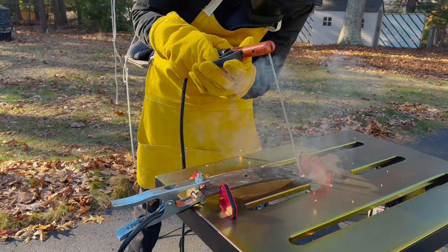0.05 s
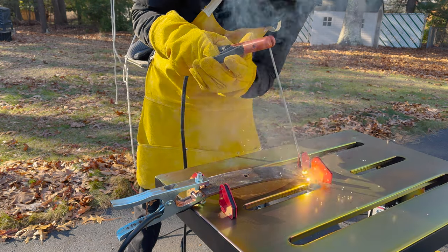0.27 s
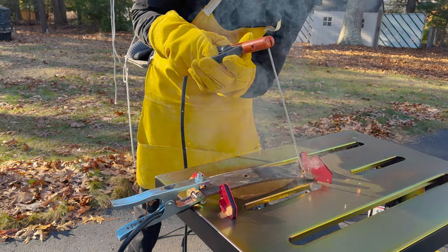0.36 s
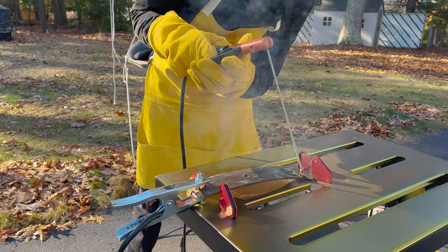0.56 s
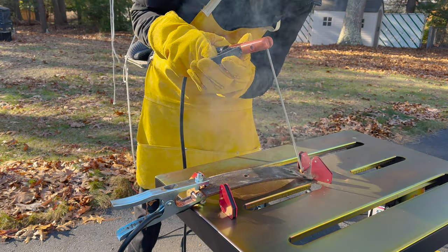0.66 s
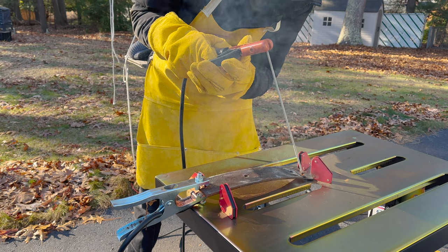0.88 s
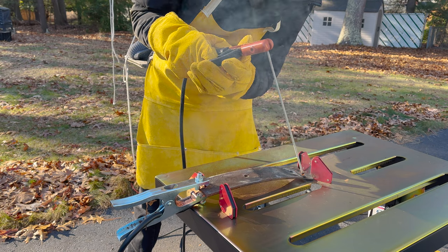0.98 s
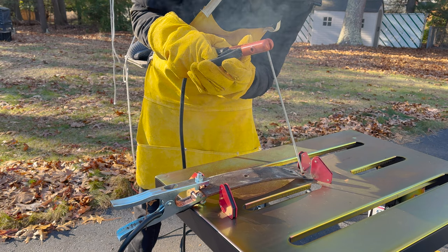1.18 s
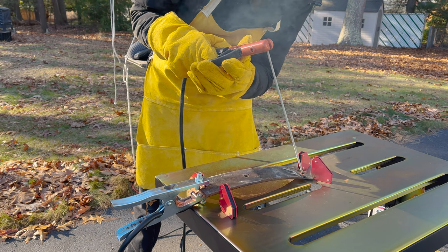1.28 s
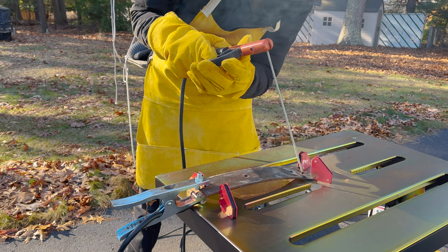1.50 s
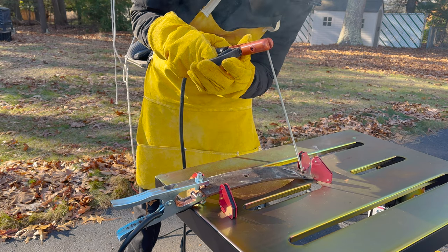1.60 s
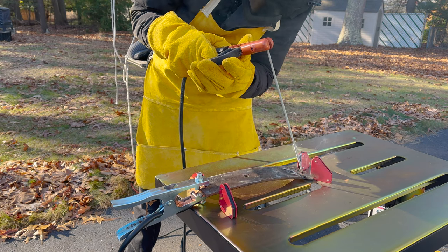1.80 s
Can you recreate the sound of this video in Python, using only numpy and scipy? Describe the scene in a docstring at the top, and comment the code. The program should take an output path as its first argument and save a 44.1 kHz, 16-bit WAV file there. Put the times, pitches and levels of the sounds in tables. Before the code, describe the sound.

Close microphone in an open yard: light slag fizz, a brief gritty arc sizzle, a hard double pop, scattered ticks dying away, then four thin rising bird whistles above a swelling low hum, fan tones and air.

```python
"""A welding arc close by outdoors, on a steel plate: it spits and sizzles, flares and blows out in two pops.
The arc is grainy filtered noise with short clicks; each pop is a crack, a boom whose pitch falls quickly
and a short dull body of fixed tones. Hot slag fizzes and ticks as filtered noise and clicks, and a small
bird gives four thin rising whistles. Under it all lie rushing air, the wavering tones of the welder's fan
and a low motor hum that swells."""
import sys
import numpy as np
from scipy import signal
from scipy.fft import rfft, irfft, next_fast_len
from scipy.io import wavfile
from scipy.ndimage import map_coordinates

SR = 44100
rng = np.random.default_rng(int(sys.argv[2]) if len(sys.argv) > 2 else 0)


def persist_wave(psi):
    """Save psi, clipped to +-1, as 16-bit WAV."""
    counts = np.round(np.clip(psi, -1, 1) * 32767).astype(np.int16)
    wavfile.write(sys.argv[1], SR, np.atleast_2d(counts).T)


N = 81585  # samples

# Left-right likeness of the weld's noise. Each row: frequency in Hz, coherence from -1 to 1.
WELD_ALIKE = [(300, .98), (800, 0.93), (1550, .35), (2200, .92), (3300, 0.57), (5000, 1), (7300, .2),
              (8600, 0.47), (10200, -0.78), (14500, 0.34)]


def amp(db):
    """Decibels to gain."""
    return 10 ** (np.asarray(db) / 20)


def unit(x):
    """Scale to rms 1."""
    return x / np.sqrt(np.mean(x ** 2) + 1e-20)


def clock():
    """Time of every sample in seconds."""
    return np.arange(N) / SR


def along(points, hz):
    """Read (Hz, value) points on a log frequency axis."""
    f, v = np.transpose(points)
    return np.interp(np.log(hz + 1), np.log(f + 1), v)


def curves(rows):
    """One value per sample for each column after the time."""
    s, *cols = np.transpose(rows)
    return [np.interp(clock(), s, c) for c in cols]


def wobble(rate):
    """A smooth random curve through rate knots a second."""
    knots = rng.standard_normal(int(N * rate / SR) + 4)
    return map_coordinates(knots, [clock() * rate])


def filtered(x, response):
    """Multiply the spectrum of x by a response of frequency, zero-padded against wrap-around."""
    m = 2 * next_fast_len(N)
    hz = np.fft.rfftfreq(m, 1 / SR)
    return irfft(rfft(x, m) * response(hz), m)[..., :N]


def causal(points):
    """The minimum-phase response with these (Hz, dB) gains, so that no sound precedes its onset."""
    def response(hz):
        # Folding the cepstrum onto positive times gives minimum phase.
        cepstrum = irfft(np.log(amp(along(points, hz))))
        half = len(cepstrum) // 2
        cepstrum[1:half] *= 2
        cepstrum[half + 1:] = 0
        return np.exp(rfft(cepstrum))
    return response


def spread(pair, alike):
    """Mix two unrelated signals into left and right of a given coherence."""
    def mid_side_gains(hz):
        turn = np.arccos(np.clip(along(alike, hz), -1, 1)) / 2
        return np.array([np.cos(turn), np.sin(turn)])
    mid, side = filtered(pair, mid_side_gains)
    return np.array([mid + side, mid - side])


def noise(spectrum, alike, grain_db):
    """Stereo noise of rms 1; a scatter of sizes makes it grainy."""
    sizes = amp(grain_db * rng.standard_normal(N))
    grains = rng.standard_normal((2, N)) * sizes
    return unit(spread(filtered(grains, causal(spectrum)), alike))


def envelope(start, attack, hold, t60):
    """Linear rise, then an exponential release that begins hold seconds after the start."""
    t = clock() - start
    return np.clip(t / attack, 0, 1) * amp(-60 * np.maximum(t - hold, 0) / t60)


def snaps(rows, spectrum, spray_db, spray_t60):
    """Each (s, dB) is a sharp filtered click, alike in both ears, trailed by a short spray of noise."""
    hits, spray = np.zeros(N), np.zeros(N)
    for s, db in rows:
        hits[round(s * SR)] += amp(db)
        spray += amp(db + spray_db) * envelope(s, 1 / SR, 0, spray_t60)
    # Scaled so that a lone click peaks at its listed level.
    peak = abs(filtered(signal.unit_impulse(N), causal(spectrum))).max()
    hiss = spread(rng.standard_normal((2, N)), WELD_ALIKE)
    return filtered(hits + spray * hiss, causal(spectrum)) / peak


def echo(x, decay):
    """A diffuse tail in which each frequency dies at its own speed."""
    hz, t, z = signal.stft(rng.standard_normal((2, SR // 2)), SR, nperseg=256)
    fading = amp(-60 * t / along(decay, hz)[:, None])
    tail = signal.istft(z * fading, SR, nperseg=256)[1]
    return signal.fftconvolve(x, tail / np.linalg.norm(tail[0]), axes=1)[:, :N]


def tone(hz, drift_hz):
    """A sine of rms 1 whose pitch drifts at random."""
    cycles = np.cumsum(hz + drift_hz * wobble(12)) / SR
    return np.sqrt(2) * np.sin(2 * np.pi * cycles)


def background():
    """Rushing air as filtered noise, the fan's wavering tones, and a wavering motor hum with its octave."""
    # Spectrum of the air. Each row: frequency in Hz, relative level in dB.
    air_spectrum = [(20, -18), (32, -8), (50, 0.5), (100, -1), (170, -8.5), (240, -9.5), (305, -13.5),
                    (345, -3.5), (395, -8), (440, -13.5), (540, -13.5), (700, -10), (950, -9), (1400, -14),
                    (1900, -21), (2600, -36.5), (4000, -49), (5000, -54), (10000, -68), (14000, -58.5)]
    # Left-right likeness of the air. Each row: frequency in Hz, coherence from -1 to 1.
    air_alike = [(60, 1), (140, .88), (210, 0.75), (330, 0.98), (500, .66), (770, -0.0089), (1170, -0.45),
                 (1550, -0.012), (2000, 0.77), (2750, 0.82), (5000, 0.96), (10000, -0.062), (15000, 0.71)]
    # Swells of the motor. Each row: time in seconds, fundamental in dB, octave in dB.
    hum_levels = [(0, -47, -69), (.3, -54.5, -57), (.45, -45, -56), (.6, -57.5, -61), (.8, -52.5, -73),
                  (1, -41, -50.5), (1.15, -52.5, -50.5), (1.3, -41, -46.5), (1.52, -52, -48.5),
                  (1.7, -43.5, -49.5), (1.85, -52.5, -59)]
    # Tones of the welder's fan. Each row: mean frequency in Hz, middle level in dB.
    fan_tones = [(297.5, -54.5), (522, -56.5)]
    air_db, hum_hz = -41.5, 70.3

    air = amp(air_db + 0.13 * wobble(6.3)) * noise(air_spectrum, air_alike, grain_db=0)
    low_db, octave_db = curves(hum_levels)
    low = amp(low_db + 2 * wobble(16)) * tone(hum_hz, drift_hz=2.27)
    octave = amp(octave_db + 0.58 * wobble(27)) * tone(2 * hum_hz, drift_hz=1.6)
    fan = sum(amp(db + 3.3 * wobble(7.44)) * tone(hz, drift_hz=1.0) for hz, db in fan_tones)
    return air + low + octave + fan


def slag():
    """Cooling slag and spatter: a grainy fizz of uneven level, and ticks as filtered clicks."""
    # Level of the fizz. Each row: time in seconds, level in dB.
    fizz_levels = [(0, -63.5), (.085, -66.5), (.12, -72), (.16, -72), (.27, -64.5), (.36, -67), (.4, -72.5),
                   (.48, -75), (.56, -69), (.635, -60.5), (.66, -68.5), (.73, -61.5), (.8, -70.5),
                   (.93, -71.5), (1.05, -79.5), (1.3, -89), (1.85, -92)]
    # Spectrum of the fizz. Each row: frequency in Hz, relative level in dB.
    fizz_spectrum = [(1500, -6.5), (3000, 2), (5000, -3.5), (6500, -1), (7600, -1), (9500, 0.5),
                     (15000, -5)]
    # Ticks of the slag. Each row: start in seconds, level in dB.
    tick_rows = [(.0755, -40), (.155, -42), (.337, -64), (.349, -61), (.363, -65), (.376, -57), (.455, -45),
                 (.4925, -43), (.536, -48), (.5513, -42), (.5715, -60), (.5905, -45), (.5935, -35),
                 (.611, -57), (.634, -40), (.6668, -24), (.9203, -44)]
    # Spectrum of a tick. Each row: frequency in Hz, relative level in dB.
    tick_spectrum = [(300, -1), (1000, 12), (1600, -4), (2400, 5), (4500, -5), (6800, 2.5), (8500, -5.5),
                     (15000, -8.5)]

    level_db, = curves(fizz_levels)
    fizz = amp(level_db + 0.95 * wobble(120)) * noise(fizz_spectrum, WELD_ALIKE, grain_db=7)
    return fizz + snaps(tick_rows, tick_spectrum, spray_db=-18, spray_t60=0.026)


def arc():
    """The arc spits unevenly while its grainy sizzle grows louder, then flares as the rod's tip melts."""
    # Sparks while the arc burns. Each row: start in seconds, level in dB.
    spit_rows = [(.1805, -16.5), (.1835, -21.5), (.1938, -18), (.2027, -20), (.2055, -19.5), (.2124, -18),
                 (.2145, -16), (.2255, -43)]
    # Spectrum of a spit. Each row: frequency in Hz, relative level in dB.
    spit_spectrum = [(150, -5), (450, 3.5), (1200, 0.5), (2700, 1.5), (3700, -4), (4600, -13.5), (6500, -9),
                     (9000, -17.5), (15000, -12.5)]
    # Spectrum of the sizzle. Each row: frequency in Hz, relative level in dB.
    sizzle_spectrum = [(100, 0), (400, 2.5), (1200, -2), (2500, 1), (3700, -2), (4500, -16), (6500, -5),
                       (9000, -14), (15000, -12.5)]
    # Spectrum of the flare. Each row: frequency in Hz, relative level in dB.
    flare_spectrum = [(200, -26.5), (600, -13.5), (1000, -11), (1600, 1), (2300, -1), (3700, -9),
                      (4700, -25.5), (7000, -20), (15000, -21.5)]
    on_s, off_s, release_s = .1805, 0.2433, 0.097
    start_db, rise_db = -42.5, 7

    burn_s = off_s - on_s
    heat = np.clip((clock() - on_s) / burn_s, 0, 1)
    burn = envelope(on_s, .001, burn_s, release_s)
    sizzle_level = amp(start_db + rise_db * heat + 1.68 * wobble(250)) * burn
    sizzle = sizzle_level * noise(sizzle_spectrum, WELD_ALIKE, grain_db=9.5)
    flare_level = amp(-18) * envelope(.2347, attack=0.0036, hold=0.0047, t60=0.039)
    flare = flare_level * noise(flare_spectrum, WELD_ALIKE, grain_db=3.5)
    return sizzle + flare + snaps(spit_rows, spit_spectrum, spray_db=-21, spray_t60=.012)


def pops():
    """Molten metal bursts: a crack, a boom whose pitch falls quickly, and a short dull body of fixed tones."""
    # Pops that blow the arc out. Each row: start in seconds, crack in dB, boom's start pitch in Hz,
    # boom's end pitch in Hz, boom in dB, boom's 60 dB decay time in seconds.
    pop_rows = [(.2400, -3, 500, 389, -13, 0.035), (.2473, -3.5, 925, 184, -9.5, 0.03)]
    # Spectrum of the crack. Each row: frequency in Hz, relative level in dB.
    crack_spectrum = [(60, -24.5), (250, -13.5), (550, 12.5), (900, 4.5), (1400, -4), (1750, -11.5),
                      (2400, 1.5), (3200, -8.5), (3900, -6.5), (4600, -25), (6200, -15.5), (8500, -23),
                      (15000, -23.5)]
    # Short dull body of fixed tones under each pop. Each row: frequency in Hz, level in dB relative
    # to the crack, 60 dB decay time in seconds.
    body_modes = [(393, -23, 0.0384), (502.5, -11, 0.034), (960, -26, 0.033), (1390, -19, 0.042),
                  (2488, -29, .04), (2735, -38, 0.029)]
    fall_s, low_cut_hz = .0011, 55

    sound = snaps([row[:2] for row in pop_rows], crack_spectrum, spray_db=-20, spray_t60=0.01)
    for s, crack_db, start_hz, end_hz, boom_db, boom_t60 in pop_rows:
        age = np.maximum(clock() - s, 0)
        # Cycles so far of a pitch that falls exponentially to its end.
        cycles = end_hz * age + (start_hz - end_hz) * fall_s * (1 - np.exp(-age / fall_s))
        boom = amp(boom_db) * envelope(s, 0.00018, 0, boom_t60) * np.sin(2 * np.pi * cycles)
        sound = sound + boom
        for hz, db, t60 in body_modes:
            body_level = amp(crack_db + db) * envelope(s, .0003, 0, t60)
            sound = sound + body_level * np.cos(2 * np.pi * hz * age)
    return filtered(sound, lambda hz: (1j * hz / (low_cut_hz + 1j * hz)) ** 2)


def bird():
    """Thin upward whistles that level off and linger among the trees."""
    # Bird calls. Each row: start in seconds, level in dB.
    call_rows = [(.845, -67), (0.986, -64), (1.114, -65), (1.248, -66)]
    # Reverberation of the trees. Each row: frequency in Hz, 60 dB decay time in seconds.
    tree_decay = [(5000, 0.26), (9000, 0.44)]
    start_hz, top_hz, glide_s = 5630, 8470, .025
    attack_s, length_s = 0.01, 0.052

    song = np.zeros(N)
    for s, db in call_rows:
        age = np.maximum(clock() - s, 0)
        hz = top_hz - (top_hz - start_hz) * np.exp(-age / glide_s) + 140 * wobble(810)
        # A gentle fade through the call, then a quick one at its end.
        shape = envelope(s, attack_s, attack_s, 0.46) * envelope(s, attack_s, length_s, .04)
        whistle = np.sin(2 * np.pi * np.cumsum(hz) / SR)
        song += amp(db + 1.3 * wobble(150)) * shape * whistle
    pair = np.array([song, song])
    return pair + amp(5) * echo(pair, tree_decay)


def scene():
    """The weld close by in an open yard, with the bird and the background around it."""
    # Reverberation of the yard. Each row: frequency in Hz, 60 dB decay time in seconds.
    yard_decay = [(200, 0.067), (2500, 0.33), (10000, 0.22)]
    weld = slag() + arc() + pops()
    return background() + weld + amp(-30) * echo(weld, yard_decay) + bird()


def record(dry):
    """The microphone's treble notches and peaks, then its steep upper band limit."""
    # Colour of the microphone. Each row: frequency in Hz, gain in dB.
    mic_colour = [(7000, 0), (7550, -9.5), (8100, -0.5), (10300, 4), (11000, -18.5), (11500, -19.5),
                  (12100, -8.5), (12800, 1.5)]
    top_hz = 16000
    coloured = filtered(dry, causal(mic_colour))
    return filtered(coloured, lambda hz: 1 / np.sqrt(1 + (hz / top_hz) ** 200))


dry = scene()
out = record(dry)
persist_wave(out)
```